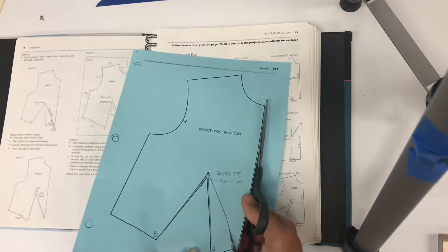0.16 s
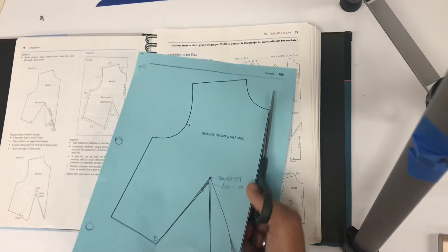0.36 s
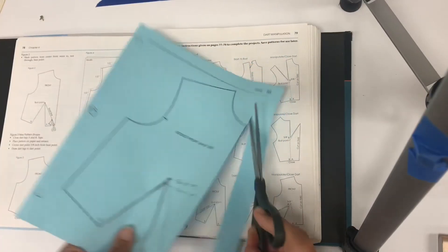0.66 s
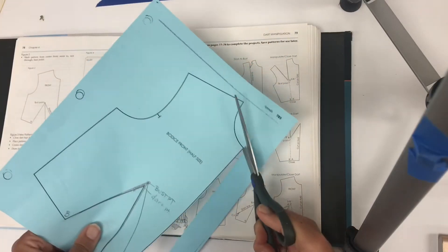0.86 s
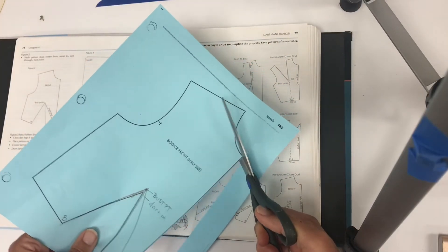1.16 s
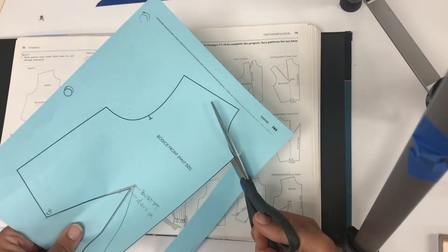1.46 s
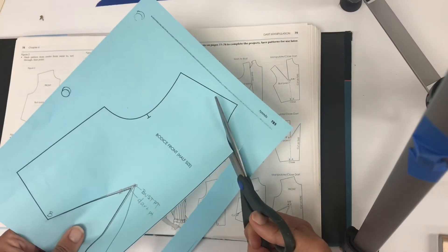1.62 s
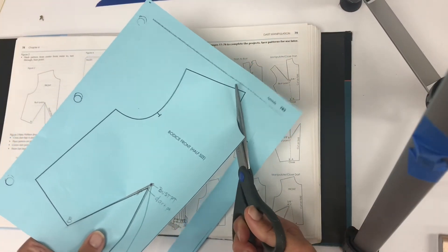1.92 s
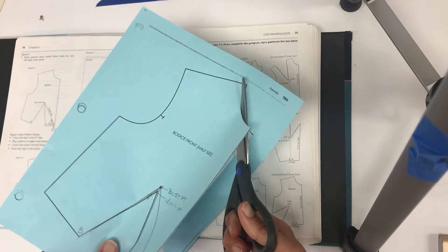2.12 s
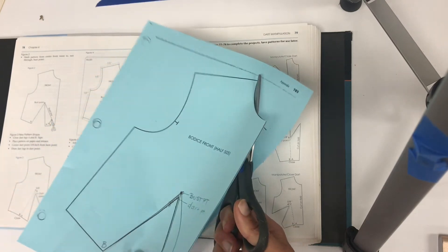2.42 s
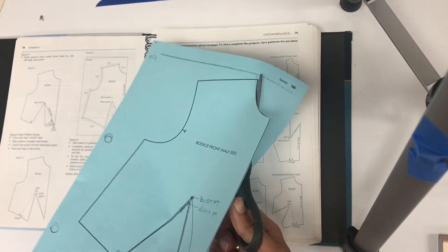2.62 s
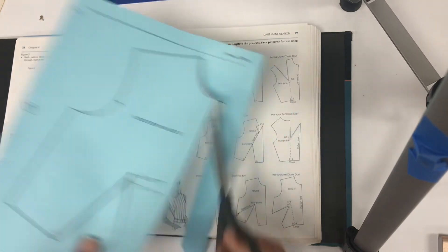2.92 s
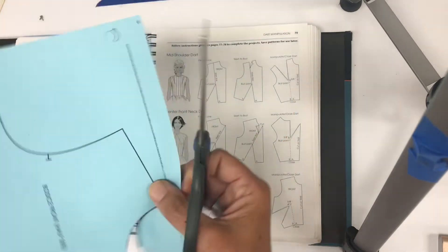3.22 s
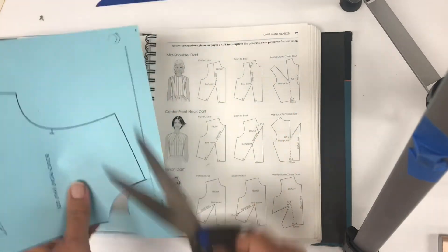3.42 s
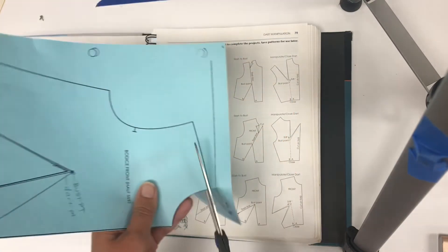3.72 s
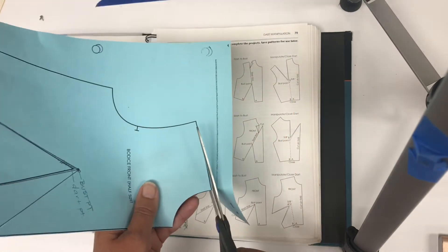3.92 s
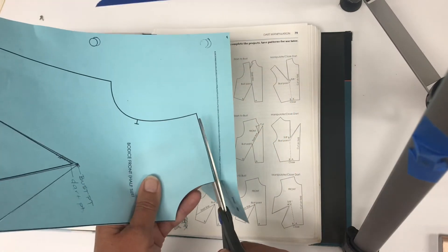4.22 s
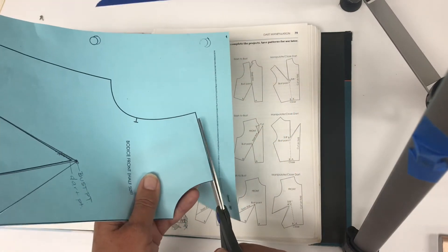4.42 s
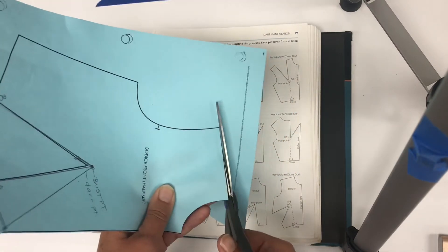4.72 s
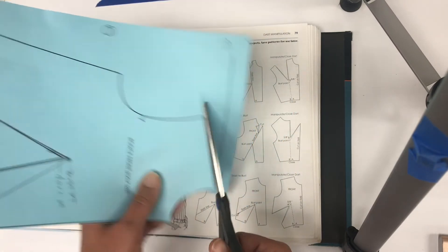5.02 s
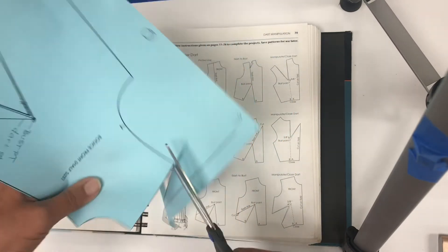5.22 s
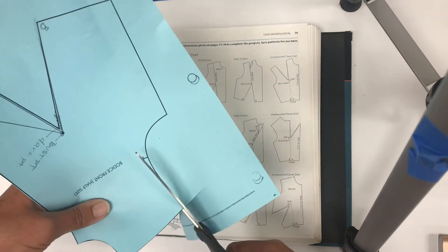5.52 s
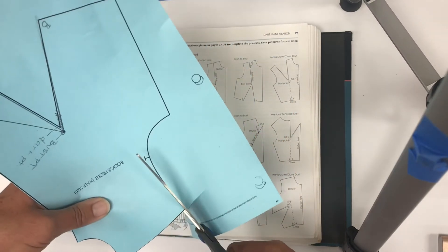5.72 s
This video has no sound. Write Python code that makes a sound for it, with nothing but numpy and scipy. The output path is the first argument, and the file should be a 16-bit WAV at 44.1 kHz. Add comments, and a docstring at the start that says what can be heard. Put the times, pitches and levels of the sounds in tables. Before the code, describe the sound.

Over the low, slightly wavering hum of a fan, a paper sheet flicks and scissors make a couple of brief snips. The blades then crunch steadily through the paper with a slight steely edge. Halfway through, the sheet crackles and swishes as it is moved around, before two more short bouts of cutting and a last light rustle. Everything sounds close and dry, in a small quiet room.

```python
"""A sheet of paper snaps and slides over the hum of a fan, then scissors start to cut it in a quiet room.
The closing blades move by stick-slip friction: each slip tears fibres in a burst of a few ms and rings
the steel. Between cuts the sheet rubs, rustles and buckles as it is turned. An open book beneath it
returns an interfering echo, and desk and walls add a short decay. The fan motor's partials waver
over a low rumble of duct resonances and a hiss of air."""
import sys
import numpy as np
from scipy import signal
from scipy.io import wavfile
from scipy.ndimage import uniform_filter1d, map_coordinates

SR = 44100
rng = np.random.default_rng(int(sys.argv[2]) if len(sys.argv) > 2 else 0)


def output_pcm(signal):
    """Save a mono or channel-first signal as 16-bit PCM at the path in sys.argv[1].

    Samples are clipped to [-1, 1] before scaling.
    """
    pcm = np.clip(np.atleast_2d(signal).T, -1, 1) * 32767
    wavfile.write(sys.argv[1], SR, np.round(pcm).astype(np.int16))


N = 258426

# fan motor partials: pitch_hz, level_db
MOTOR_PARTIALS = [(177.6, -49.5), (236.9, -61.5), (355.3, -58.5), (473.7, -66.5), (710.6, -71)]
# slow wavering of the hum: time_s, gain_db
MOTOR_SWELL = [(0, 0.5), (.8, 2.5), (1.5, -3.5), (2.3, -2), (3, 3), (4, 1.5), (4.7, 3.5), (5.86, -2.5)]
# duct resonances: pitch_hz, bandwidth_hz, level_db
DUCT_MODES = [(96.8, 10.6, -53.5), (127.5, 2.2, -62.5)]
# spectrum of the air noise: frequency_hz, relative_density_db
AIR_SPECTRUM = [(40, -25.5), (90, -5), (140, -13), (240, -13), (500, -21), (750, -25.5), (1000, -30),
                (1700, -34), (9000, -42.5), (16000, -39.5)]
# delay of the book's echo, which follows the height of the sheet: time_s, lag_ms
BOOK_LAG = [(0.2, 0.12), (0.79, 0.15), (0.85, 0.17), (1.4, 0.24), (1.9, 0.24), (2.75, 0.31), (3.2, 0.2),
            (3.45, 0.19), (4.25, 0.21), (4.7, 0.2), (4.9, 0.19)]
# spectrum of the moving sheet: frequency_hz, relative_density_db
RUSTLE_SPECTRUM = [(280, -1.5), (650, 7), (1400, 1), (3200, -2.5), (5000, -4), (13000, -10.5), (16000, -4)]
# the sheet rubs on blades, hands and book:
# start_s, end_s, first_db, last_db, treble_db, body_db, resonance_hz
SHEET_SLIDES = [(0.049, 0.131, -41.5, -49, 0, -3, 1910), (0.374, 0.465, -46, -47, -1, -8, 1170),
                (0.655, 0.742, -44.5, -58, 1.5, -5, 1960), (0.746, 0.807, -45.5, -45, 3, -10.5, 3150),
                (0.81, 0.97, -50.5, -59, 6.5, -9, 3170), (2.924, 3.078, -48, -69, 3, -3, 6600),
                (3.137, 3.185, -56, -63, 7, 4, 10200), (3.187, 3.284, -47.5, -51.5, 2.5, 4, 2470),
                (3.384, 3.419, -34, -50, 4.5, -0.5, 900), (3.423, 3.54, -36, -70, -2, -3.5, 650),
                (3.633, 3.662, -48, -52, -1.5, -10, 2660), (3.669, 3.965, -48, -73.5, 7, -2.5, 2520),
                (4.634, 4.69, -30.5, -45, -4.5, 1.5, 618), (4.689, 4.743, -39, -48.5, -3, 2, 790),
                (5.048, 5.102, -52.5, -48.5, 1.5, -2, 6400), (5.12, 5.205, -47.5, -64, 7, -8, 10600),
                (5.217, 5.328, -60.5, -54.5, 11.5, -29, 3360), (5.372, 5.542, -58.5, -62, 3, -31, 3150),
                (5.777, 5.82, -69, -46, -6.5, 0, 5360)]
# the sheet buckles or taps: start_s, level_db, t60_ms, treble_db, body_db
SHEET_SNAPS = [(0.039, -35.5, 26, -4, -5), (0.362, -36, 14, 0, -17), (0.6176, -41, 83, -3, -4),
               (0.644, -32.5, 39, -2.5, -5), (0.653, -21.5, 20.5, -5.5, -17), (1.451, -15, 5.8, -43, 1),
               (2.941, -34, 73, 8.5, -16), (2.971, -20.5, 16.5, 9.5, 7.5), (3.114, -41.5, 44, 6, 2),
               (3.1403, -35.5, 17, -7, 3), (3.187, -24.5, 41, -0.5, -3), (3.241, -26.5, 22, -3, -22),
               (3.282, -35, 38, -24, -2), (3.4179, -20, 59, 1.5, -3.5), (3.4756, -21.5, 12.4, -11, -9),
               (3.558, -29, 34, -16, -9.5), (3.62, -40, 39, 3, -1), (3.9735, -29.5, 7.6, -10, -13)]
# spectrum of tearing fibres: frequency_hz, relative_density_db
TEAR_SPECTRUM = [(400, -4), (720, 9.5), (1150, 10), (1600, -2.5), (2900, 3.5), (4400, -3), (6200, -3),
                 (12500, -8.5), (16000, -7.5)]
# modes of the steel blades: pitch_hz, gain_db, t60_s
BLADE_MODES = [(6070, -1.5, 0.022), (11300, -21, 0.029)]
# closings of the blades: start_s, end_s, crackle_db, treble_db, body_db, resonance_hz
BLADE_CLOSINGS = [(0.216, 0.32, -65, 1, -10.5, 12000), (0.495, 0.582, -54, 3, -14, 13700),
                  (1.221, 1.605, -63, 2.5, -9, 1290), (1.601, 1.945, -69, -1.5, -5.5, 9600),
                  (1.96, 2.238, -74.5, 2.5, -2, 8300), (2.392, 2.6, -89, 6, -2.5, 4080),
                  (2.66, 2.884, -73, 2.5, -4.5, 12100), (4.226, 4.475, -62, 4, -6, 13600),
                  (4.51, 4.555, -67, -2, -8, 7200), (4.843, 4.967, -82, 1.5, -10, 6350),
                  (4.979, 5.05, -60, 3.5, -11, 3320)]
# single slips of the blades: start_s, nominal_width_ms, level_db
BLADE_SLIPS = [(0.199, 2.1, -46), (0.2183, 4.8, -38), (0.231, 1.9, -39), (0.236, 5.6, -38.5),
               (0.249, 3.8, -36), (0.2588, 5.3, -38.5), (0.272, 4.3, -38.5), (0.2819, 3, -35),
               (0.288, 1.7, -38), (0.3, 2.7, -34), (0.313, 2.6, -33), (0.507, 2.6, -28.5),
               (0.516, 4.5, -35), (0.526, 4.7, -39), (0.5404, 1.6, -30), (0.5663, 1.3, -42),
               (0.573, 1.5, -41), (1.2296, 1.3, -41), (1.246, 0.79, -35.5), (1.251, 13, -53),
               (1.372, 5.5, -40.5), (1.393, 7.8, -43.5), (1.422, 7.5, -45.5), (1.438, 3.2, -46),
               (1.448, 6.8, -45.5), (1.463, 1.2, -33), (1.476, 9.4, -52), (1.5362, 5.2, -43),
               (1.5685, 6.5, -44.5), (1.615, 4, -35), (1.634, 1.9, -34), (1.64, 3.5, -34),
               (1.6654, 4.1, -33), (1.6793, 2, -41), (1.6966, 4.2, -39.5), (1.7063, 2, -41),
               (1.713, 1.7, -34.5), (1.7466, 2.1, -32.5), (1.784, 2, -32.5), (1.8037, 2.9, -32),
               (1.8515, 1.56, -34), (1.875, 4.8, -36.5), (1.901, 2.6, -33.5), (1.9094, 1.6, -34),
               (1.916, 1.1, -30.5), (1.925, 2.3, -40), (1.9376, 1.4, -29), (1.9827, 1.4, -28),
               (1.987, 4.3, -29), (2.101, 2.8, -29.5), (2.1461, 3.6, -32), (2.1593, 1.3, -29),
               (2.1895, 2.1, -27), (2.2142, 4.4, -33.5), (2.2255, 4.3, -34), (2.3956, 1.7, -27.5),
               (2.406, 5.6, -37), (2.4666, 2.8, -31.5), (2.491, 4.1, -42.5), (2.571, 2.5, -31.5),
               (2.582, 3.1, -33.5), (2.5977, 2.8, -30), (2.676, 2.5, -32), (2.706, 2.5, -24),
               (2.7418, 5.1, -31.5), (2.7703, 3.15, -29.5), (2.87, 16.3, -32), (4.228, 3.8, -46.5),
               (4.2341, 3.5, -37), (4.2512, 4.5, -36), (4.259, 17, -44.5), (4.2855, 5.9, -36),
               (4.296, 4.8, -43), (4.3123, 6.2, -34.5), (4.3214, 5.3, -47), (4.3344, 1.6, -33),
               (4.3488, 5.6, -33.5), (4.364, 4.6, -34.5), (4.375, 2.6, -42), (4.394, 3, -32.5),
               (4.415, 4.9, -31), (4.428, 3.3, -37), (4.4391, 2.7, -34.5), (4.452, 5.5, -30),
               (4.463, 4.3, -35), (4.5077, 3.9, -22.5), (4.5215, 3.8, -24), (4.526, 5.5, -31),
               (4.5367, 3.2, -30), (4.546, 3.2, -25), (4.8539, 2.4, -33), (4.9024, 1.7, -33),
               (4.913, 4, -36), (4.9237, 6.5, -37.5), (4.9376, 3.3, -31), (4.9478, 5.1, -36.5),
               (4.958, 2.2, -39), (4.9742, 3.3, -27.5), (4.9835, 2, -27.5), (4.993, 1.9, -25),
               (4.9999, 3, -24.5), (5.009, 3, -23.5), (5.0154, 4.3, -20.5), (5.0295, 8.3, -26.5)]

BAND_EDGES_HZ = 40 * 2 ** (np.arange(28) / 3)
AIR_DB, CUTOFF_HZ = -50, 15750
ROOM_DB, ROOM_T60_S = -14, 0.052
ECHO_GAIN, ECHO_HIGHPASS_HZ = 0.4, 1500
SWELL_SHARE, FADE_SHARE, MAX_SWELL_MS = 0.23, 0.49, 1.5625   # shares of a slip's whole span
CRACKLE_RATE_HZ, CRACKLE_SPREAD_DB, RING_SPREAD_DB = 65, 8, 4


def from_db(db):
    """Amplitude ratio: tenfold for every 20 dB."""
    return 10 ** (np.asarray(db) / 20)


def rms_one(x):
    """Normalisation to unit mean power."""
    return x / np.sqrt(np.mean(x ** 2) + 1e-20)


def drift(rate_hz):
    """Low-passed noise gives a slow random fluctuation of unit rms."""
    pole = np.exp(-2 * np.pi * rate_hz * 40 / SR)   # one step per 40 samples
    slow = signal.lfilter([1], [1, -2 * pole, pole * pole], rng.standard_normal(N // 40 + 2002))[2000:]
    return np.interp(np.arange(N) / 40, np.arange(len(slow)), rms_one(slow))


def resonance(x, hz, width_hz):
    """Forced response of a damped oscillator, with unit gain at its peak."""
    r = np.exp(-np.pi * width_hz / SR)
    feedback = [1, -2 * r * np.cos(2 * np.pi * hz / SR), r * r]
    return signal.lfilter(np.array([1, 0, -1]) * (1 - r * r) / 2, feedback, x)


def grains(per_s, spread_db):
    """Shot noise: two independent streams of uneven clicks, of unit rms."""
    sizes = from_db(spread_db * np.minimum(rng.exponential(1, (2, N)), 4)) * rng.choice([-1, 1], (2, N))
    return rms_one(sizes * (rng.random((2, N)) < per_s / SR))


def latest(starts_s):
    """For every sample, the index of the event that began last."""
    return np.maximum(np.searchsorted(starts_s, np.arange(N) / SR) - 1, 0)


def coloured(drives, spectrum, event=0, treble_db=0, body_db=0, peak_hz=1, peak_db=11,
             scatter_db=0, flicker_db=0):
    """Source-filter shaping: each event redistributes a constant power among third-octave bands."""
    points_hz, points_db = np.transpose(spectrum)
    edges = BAND_EDGES_HZ[BAND_EDGES_HZ > points_hz[0] / 1.5].clip(max=.45 * SR)
    hz, width = np.sqrt(edges[1:] * edges[:-1]), np.diff(edges)
    db = np.interp(np.log(hz), np.log(points_hz), points_db)
    db = db + np.outer(treble_db, np.clip(np.log2(hz / 3500), 0, 1.2))
    db = db + np.outer(body_db, np.clip(np.log2(2000 / hz), 0, 1))
    db = db + peak_db * np.exp(-(np.log2(np.outer(1 / np.asarray(peak_hz), hz)) / 0.16) ** 2)
    db = db + scatter_db * rng.standard_normal(db.shape)
    gains = from_db(db) / np.sqrt(from_db(2 * db) @ width * 2.2 / SR)[:, None]
    out = 0
    for k in range(len(hz)):
        bandpass = signal.butter(2, edges[k:k + 2], "band", fs=SR, output="sos")
        band = signal.sosfilt(bandpass, drives[k % 2] + 1e-18)
        band = np.roll(band, -round(0.3 * SR / width[k]))   # offsets group delay: bands speak together
        flicker = from_db(flicker_db * drift(22)) if flicker_db else 1
        out = out + gains[event, k] * flicker * band
    return out


def fan():
    """Periodic motor vibration gives partials; noise excites duct resonances and adds a broad hiss."""
    t, hum = np.arange(N) / SR, 0
    for hz, db in MOTOR_PARTIALS:
        amplitude = np.sqrt(2) * from_db(db + 0.95 * drift(1.9))
        hum += amplitude * np.sin(2 * np.pi * (hz * t + rng.random()) + 0.2 * drift(2.7))
    drone = sum(from_db(db) * rms_one(resonance(rng.standard_normal(N), hz, width))
                for hz, width, db in DUCT_MODES)
    air = coloured(rng.standard_normal((2, N)), AIR_SPECTRUM)
    swell = from_db(np.interp(t, *np.transpose(MOTOR_SWELL)))
    return swell * hum + drone + from_db(AIR_DB) * air


def room_reflections(x):
    """Reverberation: reflections from desk and walls merge into a dull exponential decay."""
    t = np.arange(SR // 5) / SR
    response = signal.lfilter([1], [1, -.6], rng.standard_normal(len(t))) * from_db(-60 * t / ROOM_T60_S)
    return from_db(ROOM_DB) * signal.fftconvolve(x, response / np.sqrt(np.sum(response ** 2)))[:N]


def book_echo(x):
    """Comb filtering: direct sound interferes with an inverted echo whose gliding lag sweeps the peaks."""
    n = np.arange(N)
    lag = np.interp(n / SR, *np.transpose(BOOK_LAG)) * SR / 1000
    thin = signal.sosfilt(signal.butter(1, ECHO_HIGHPASS_HZ, "high", fs=SR, output="sos"), x)
    echo = map_coordinates(thin, [n - lag], order=1)
    return (x - ECHO_GAIN * echo) / np.sqrt(1 + ECHO_GAIN ** 2)


def sheet_slides():
    """Sliding friction: clumps of tiny impacts make a rustle, coloured by a resonance of the sheet."""
    t, force = np.arange(N) / SR, np.zeros(N)
    for start, end, first_db, last_db, *_ in SHEET_SLIDES:
        on = slice(round(start * SR), round(end * SR))
        swell_db = 5 * np.hanning(on.stop - on.start)
        force[on] = from_db(np.interp(t[on], [start, end], [first_db, last_db]) + swell_db)
    force = uniform_filter1d(uniform_filter1d(force, size=450), size=250)
    force *= from_db(2.5 * drift(140))   # clumps the grains
    starts, *_, treble_db, body_db, resonance_hz = np.transpose(SHEET_SLIDES)
    return coloured(force * grains(12000, spread_db=3.5), RUSTLE_SPECTRUM, latest(starts - .01),
                    treble_db, body_db, resonance_hz, peak_db=13.5, scatter_db=1.1, flicker_db=2.5)


def sheet_snaps():
    """Impulsive excitation: a buckle or tap gives a crack whose crackle decays exponentially."""
    envelope = np.zeros(N)
    for start, level_db, t60_ms, *_ in SHEET_SNAPS:
        at = round(start * SR)
        age_ms = np.arange(min(N - at, SR // 4)) * 1000 / SR
        attack = np.minimum(age_ms / 1.5, 1)
        envelope[at:at + len(age_ms)] += attack * from_db(level_db - 60 * age_ms / t60_ms)
    starts, *_, treble_db, body_db = np.transpose(SHEET_SNAPS)
    return coloured(envelope * grains(12000, spread_db=2), RUSTLE_SPECTRUM, latest(starts),
                    treble_db, body_db, scatter_db=1.6)


def stick_slip():
    """Stick-slip friction releases energy in bursts: their envelope swells, holds and fades."""
    envelope = np.zeros(N)
    for start, width_ms, level_db in BLADE_SLIPS:
        span_ms = width_ms / (1 - (SWELL_SHARE + FADE_SHARE) / 2)
        at, count = round(start * SR), round(span_ms * SR / 1000)
        progress = np.arange(count) / count
        swell = np.minimum(progress / min(SWELL_SHARE, MAX_SWELL_MS / span_ms), 1)
        fade = np.minimum((1 - progress) / FADE_SHARE, 1)
        envelope[at:at + count] += from_db(level_db) * swell * fade
    # faint slips come at random all through a cut
    crackle = from_db(CRACKLE_SPREAD_DB * np.clip(drift(CRACKLE_RATE_HZ), -2, 2))
    for start, end, crackle_db, *_ in BLADE_CLOSINGS:
        on = slice(round(start * SR), round(end * SR))
        envelope[on] += from_db(crackle_db) * crackle[on]
    return envelope


def scissors():
    """Fracture: each slip snaps fibres, and their clicks drive the blade modes with varying strength."""
    starts, closings = np.array(BLADE_SLIPS)[:, 0], np.array(BLADE_CLOSINGS)
    closing_of_slip = np.maximum(np.searchsorted(closings[:, 0], starts) - 1, 0)
    *_, treble_db, body_db, resonance_hz = closings[closing_of_slip].T
    slip = latest(starts)
    fibres = stick_slip() * grains(16000, spread_db=5.5)
    tear = coloured(fibres, TEAR_SPECTRUM, slip, treble_db, body_db, resonance_hz, scatter_db=3)
    steel = 0
    for hz, db, t60_s in BLADE_MODES:
        strength = from_db(db + RING_SPREAD_DB * rng.standard_normal(len(starts)))
        steel += resonance(tear * strength[slip], hz, width_hz=np.log(1000) / np.pi / t60_s)
    return tear + steel


def scene():
    """Superposition: the paper sounds, their reflections and the fan add in one channel."""
    paper = book_echo(scissors() + sheet_snaps() + sheet_slides())
    return (paper + room_reflections(paper) + fan())[None]


def record(dry):
    """Band limiting: the microphone softens the top treble, drops deep bass and cuts off steeply."""
    dry = signal.sosfilt(signal.butter(2, 14000, fs=SR, output="sos"), dry)
    dry = signal.sosfilt(signal.butter(3, 62, "high", fs=SR, output="sos"), dry)
    return signal.sosfilt(signal.ellip(10, .5, 70, CUTOFF_HZ, fs=SR, output="sos"), dry)


dry = scene()
out = record(dry)
output_pcm(out)
```